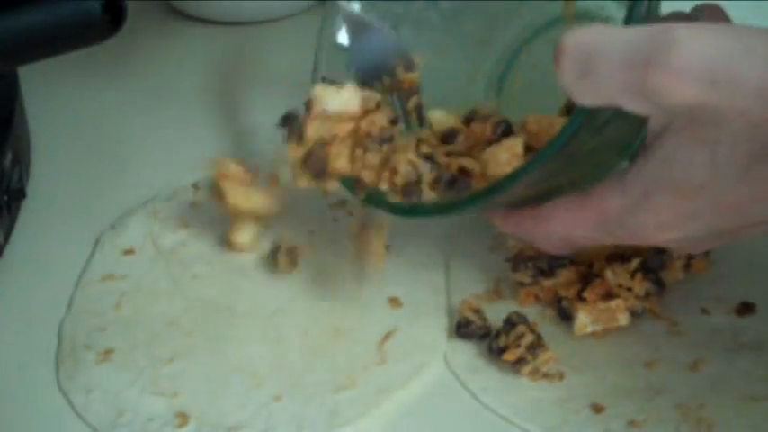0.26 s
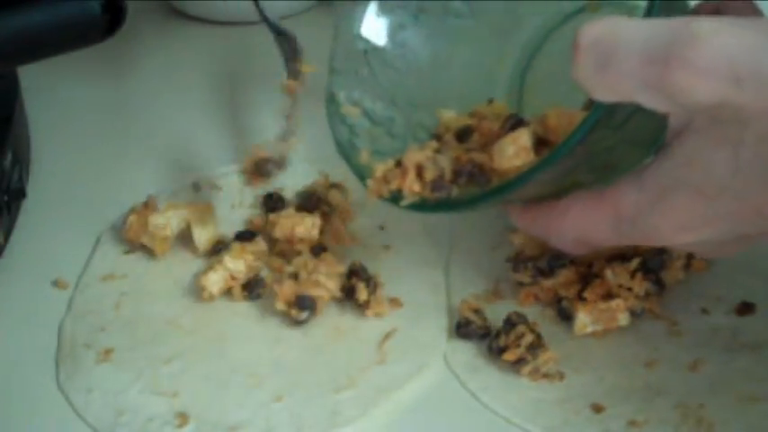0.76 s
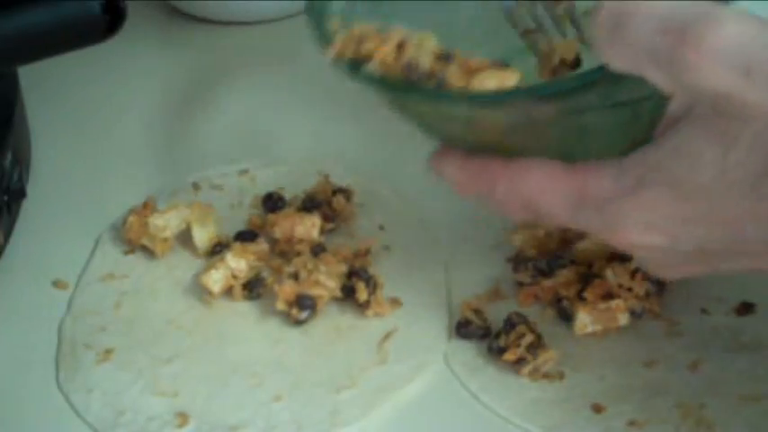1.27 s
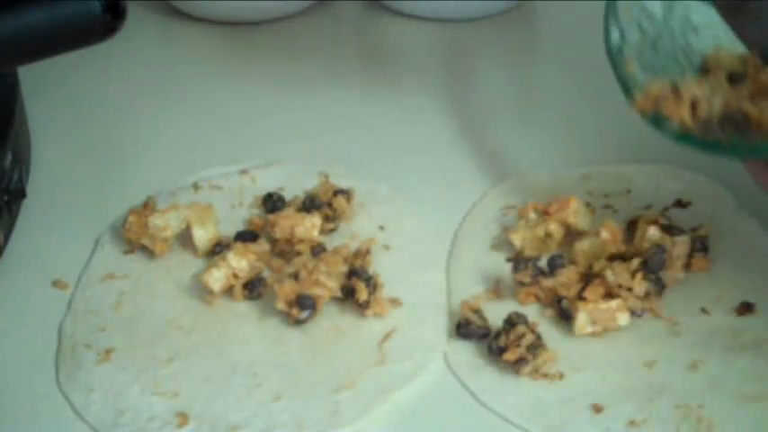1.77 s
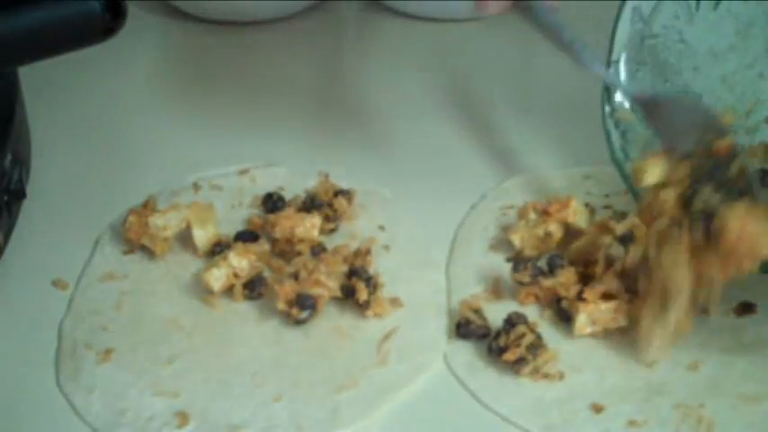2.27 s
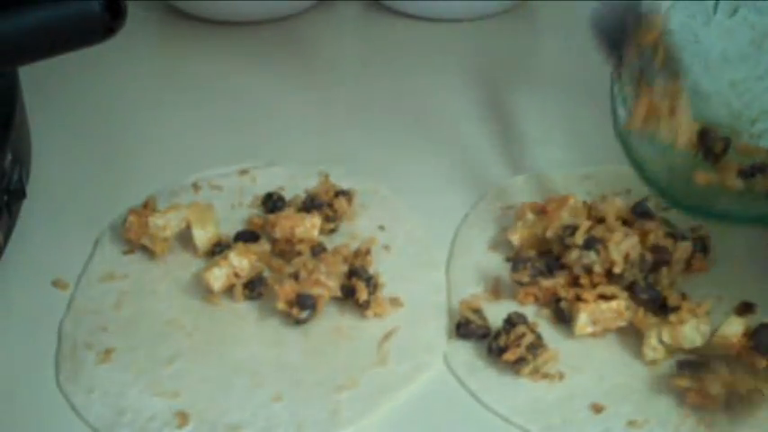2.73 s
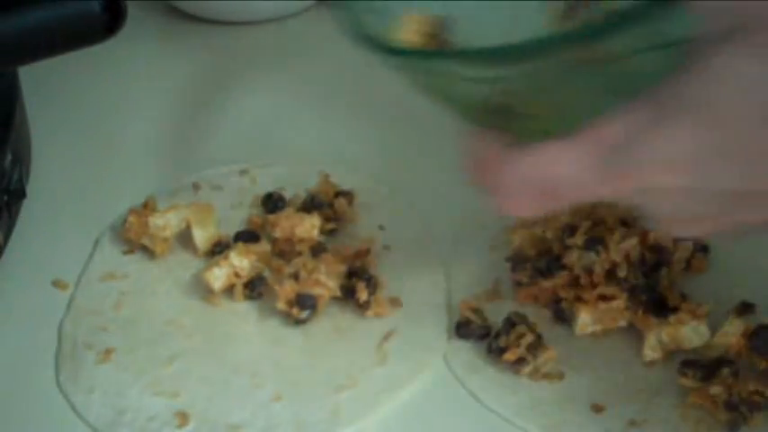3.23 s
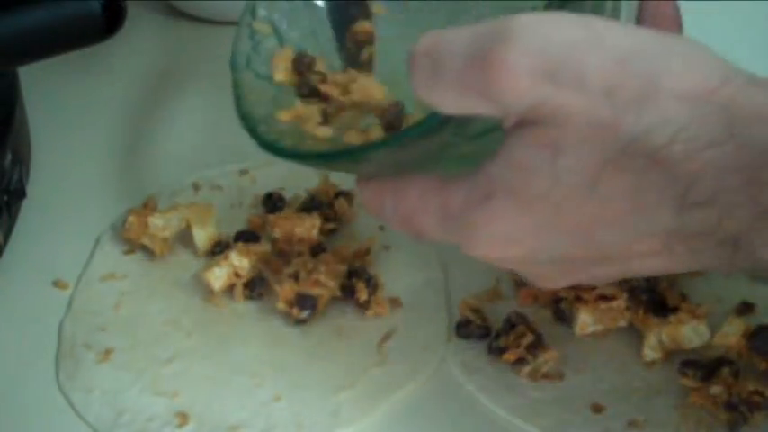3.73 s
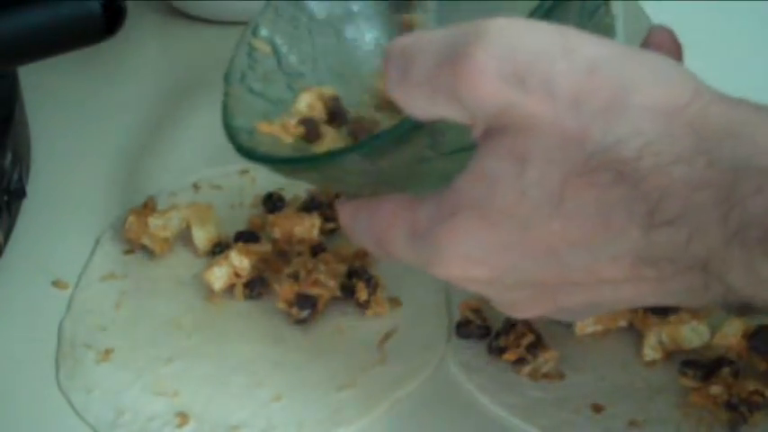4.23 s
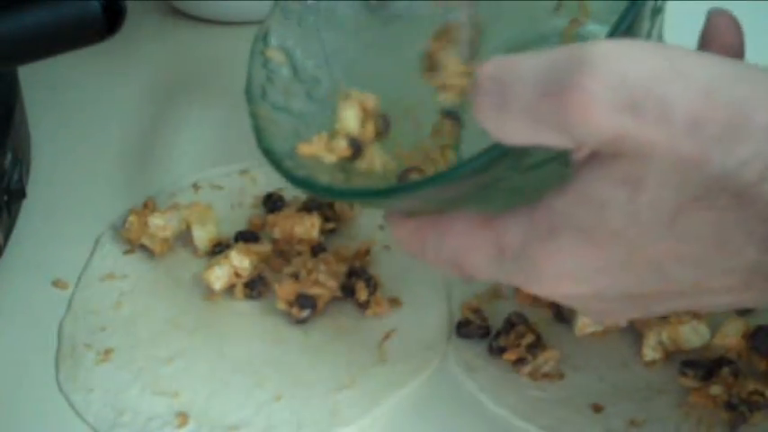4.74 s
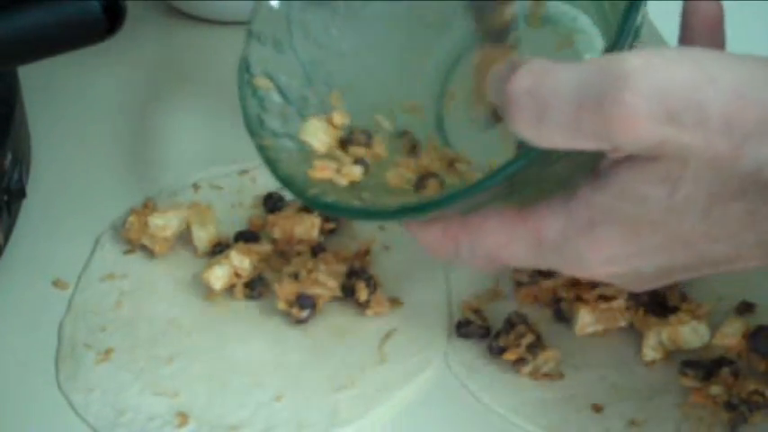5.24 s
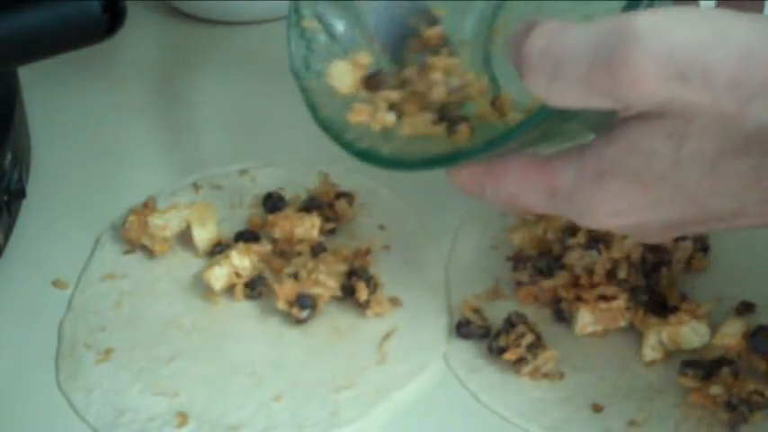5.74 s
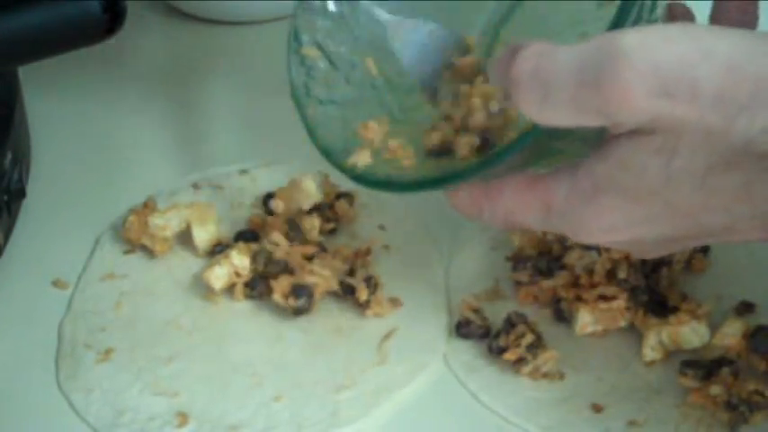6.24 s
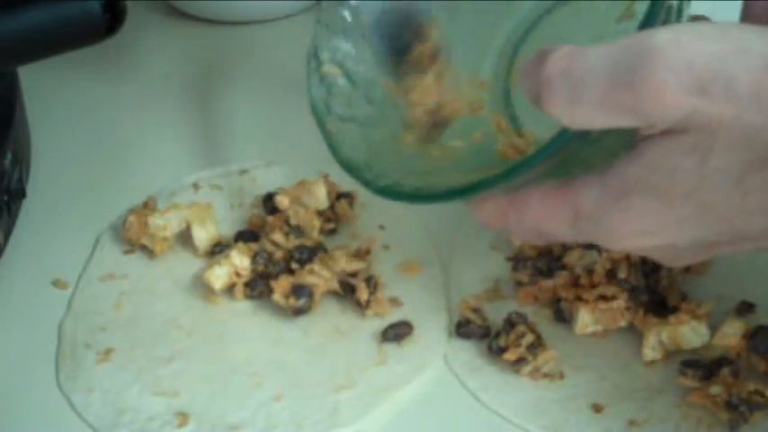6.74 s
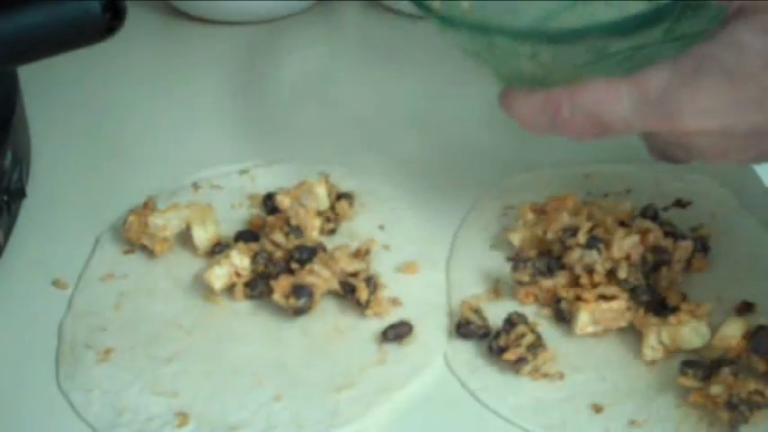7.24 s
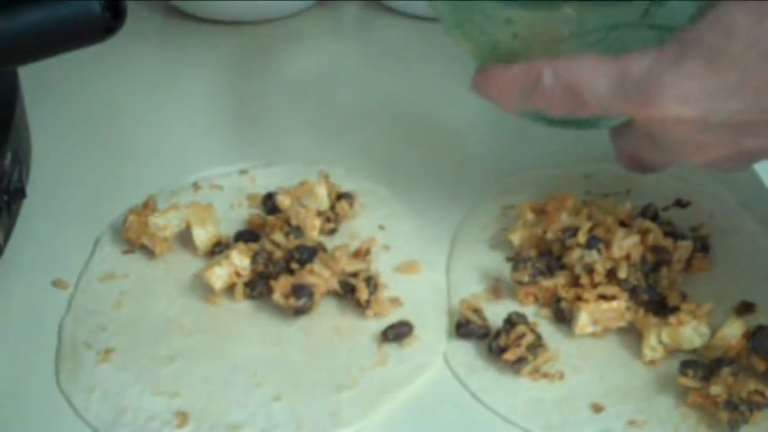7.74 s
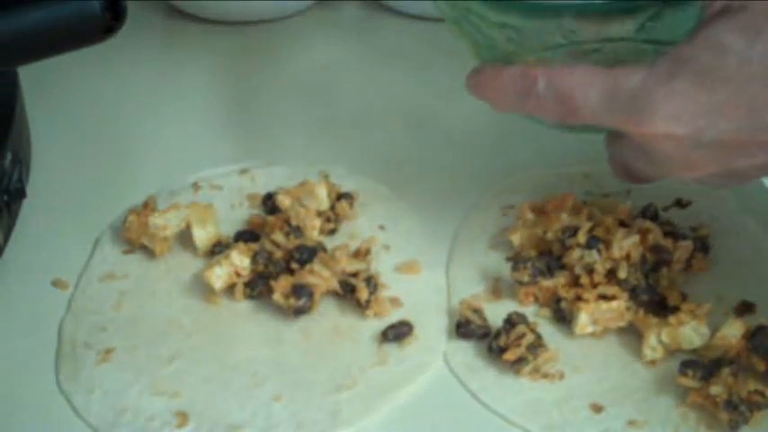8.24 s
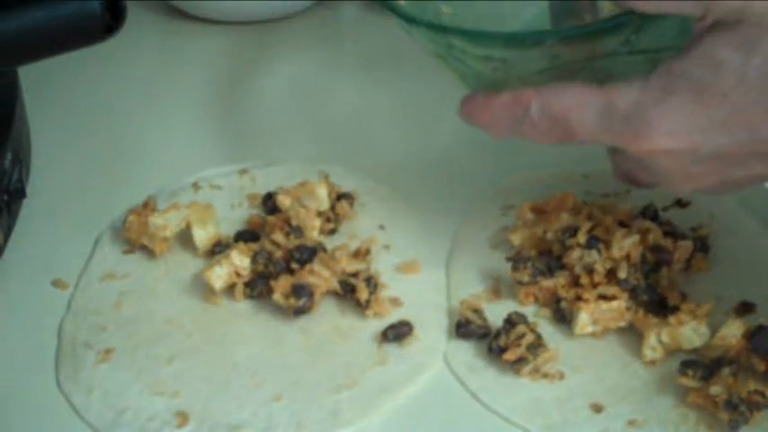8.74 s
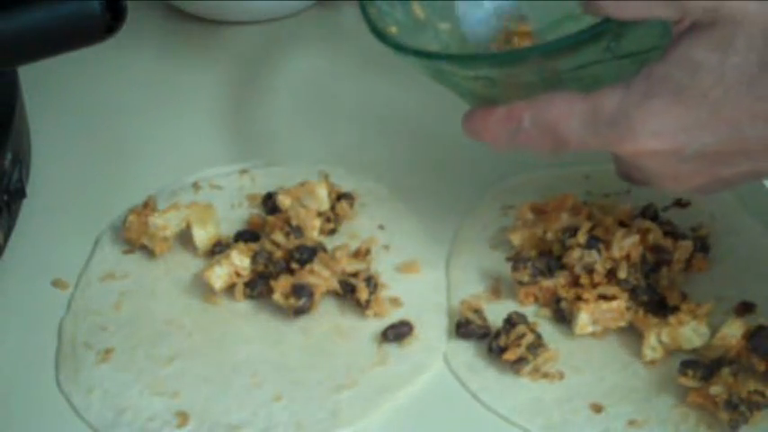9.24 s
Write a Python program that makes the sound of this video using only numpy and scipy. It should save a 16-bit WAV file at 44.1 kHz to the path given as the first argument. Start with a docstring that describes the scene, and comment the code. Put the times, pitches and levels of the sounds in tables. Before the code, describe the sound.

Moist chunky food is pushed from a glass bowl onto soft flatbread. Quiet sticky crackles and dull plops give way to sharp glassy taps, some pressed and rattling. Halfway, taps crowd together and the fork drags roughly along the glass; then loud single clinks alternate with faint wet stirring. Close stereo microphones, slightly left, small live room, faint fan hum, air and hiss.

```python
"""A steel fork clinks in a hand-held glass bowl and scrapes a moist food mix out onto tortillas.
First come a faint clink, wet strokes made of tiny pops and soft noise thuds of landing lumps; then scattered
clinks: noise clatter, a wall knock and ringing glass modes. Light pushes and rasps of coloured clicks follow.
Near 5 s the clinks crowd together, then jerky clicks make one long scrape; hard clinks and strokes end it.
Throughout, a small kitchen carries the ring on over faint hum, air and hiss; the input limits the peaks."""
import sys
import numpy as np
from scipy import signal
from scipy.fft import rfft, irfft
from scipy.io import wavfile
from scipy.ndimage import uniform_filter1d

SR = 44100
rng = np.random.default_rng(int(sys.argv[2]) if len(sys.argv) > 2 else 0)


def to_wav(s):
    """Save 16-bit WAV."""
    ch = np.atleast_2d(s).T  # columns
    pcm = np.round(np.clip(ch, -1, 1) * 32767)  # PCM
    wavfile.write(sys.argv[1], SR, pcm.astype(np.int16))


N = 418950
TIME = np.arange(N) / SR  # [s]

# fork blows on the glass; where each lands sets how hard it drives the bowl's groups of modes:
# (time [s], clack [dB], tick [dB], knock [dB], first, second, third, fourth rim mode [dB],
#  how far the fork stays pressed [0-1], ring length as the grip allows [x], left over right [dB])
FORK_BLOWS = [(0.001, -41, -49, -59, -31.5, -23.5, -33, -55, 0.17, 1, 13),
              (1.311, -11.5, -8.5, -32, -33.5, -23, -0.5, -14.5, 0.1, 1, 3.6),
              (1.714, -18, -19.5, -43, -32.5, -47, -29, -14.5, 0.9, 1.1, 9),
              (3.376, -15.5, -9, -36, -34.5, -20, -13.5, -11.5, 0.65, 1, 1.8),
              (3.455, -27.5, -29, -59, -48, -33.5, -24, -39, 0.18, 0.96, 5.4),
              (3.587, -29.5, -40.5, -60, -45.5, -39.5, -47, -34, 0.5, 0.88, 1.5),
              (3.995, -45, -28, -44.5, -74, -52, -55, -24.5, 1, .8, 1),
              (4.45, -64, -58, -39, -44, -74, -65, -56, 0.046, .6, 4.4),
              (4.905, -26.5, -27, -36, -35.5, -34, -17.5, -23.5, 0.01, .9, 10.5),
              (4.977, -12, -6.5, -23.5, -14.5, -11, -5, -21, 0.073, .8, 4.3),
              (5.264, -17, -10.5, -31.5, -28, -31, -8, -11, 0.56, 1, 14),
              (5.46, -22.5, -23.5, -47, -37, -38, -26, -25.5, 0.9, 1, 4),
              (5.685, -29, -40, -52, -47, -40.5, -24, -37, 0.77, 1, 5.5),
              (6.302, -62, -32, -34, -25.5, -51, -62, -39, .05, .75, 7.3),
              (6.87, -14, -4, -25.5, -12.5, -7, 2, -2.5, 0.15, .85, 5.4),
              (7.498, -8, -5.5, -22.5, -23.5, -8.5, 1, -12.5, 0.23, .9, 8.3),
              (8.103, -16.5, -16.5, -33, -21.5, -14, -4.5, -9.5, 0.48, .7, 7),
              (8.631, -36.5, -30, -38.5, -55, -53, -58, -10.5, 0.1, .3, 4),
              (9.15, -24.5, -15, -39.5, -39, -21.5, -12, -12.5, 0.11, .8, 4.5),
              (9.237, -35.5, -32, -67, -43.5, -36, -27, -27, 0.19, 1, 5)]
# light touches of the tines: (time [s], ring [dB], pitch driven hardest [Hz], clack [dB])
LIGHT_TOUCHES = [(0.171, -55, 1474, -62), (0.556, -49, 5600, -60), (1.397, -41, 3370, -45.5),
                 (2.864, -62, 5670, -59.5), (4.418, -41, 8200, -42.5), (4.899, -34, 8200, -41),
                 (5.29, -46, 7000, -33.5), (5.613, -40, 2330, -43.5), (6.429, -50, 1474, -72),
                 (7.541, -35, 1474, -67), (8.824, -53.5, 3300, -68), (9.146, -24, 8000, -35.5)]
TOUCH_FALL_DB = 20  # per octave away from the pitch driven hardest
# ways the bowl rings, in five groups: four rim modes and the upper ones. The lowest two have a faint
# twin that the hand hardly damps: (pitch [Hz], level [dB], time to fall 60 dB before grip and bend [s])
BOWL_MODES = [
    [(1474, 0, .14), (966, -20, .07), (1477, -26, .4)],
    [(3290, 0, .11), (3335, -13, .09), (3278, -28, .38)],
    [(5527, 0, .07), (5380, -22, .05)],
    [(8135, 0, .11)],
    [(8935, -4, .07), (10065, -9, .08), (10900, -6, .06), (11030, -8, .07), (11240, -6, .07),
     (13120, -10, .07)],
]
# a fork that stays pressed damps the modes, mostly below REACH_HZ, and makes their pitch jitter
PRESS_DAMPING, PRESS_JITTER_HZ, REACH_HZ = 0.81, 85, 7000
# the pressed tines buzz in one broad resonance and pull the bowl's nearby modes sharp
FORK_HZ, FORK_Q, FORK_PULL_HZ = 5200, 7, 160
# tone of the fork's clack on the glass: (pitch [Hz], level [dB])
CLACK_COLOUR = [(250, -26.5), (500, -15), (1100, -3), (1600, 3), (2100, 4), (2900, 2), (3700, 2),
                (4300, -6), (5200, 12), (6200, -14), (9000, -34.5)]
# tone of the sharper tick: (pitch [Hz], level [dB])
TICK_COLOUR = [(2000, -43.5), (4000, -11), (5200, -7), (6500, -9.5), (7500, 0), (8600, -3), (9500, -16),
               (11300, -14.5), (13800, -17.5), (15000, -37.5)]
# low modes of the bowl in the hand: (pitch [Hz], level [dB], time to fall 60 dB [s])
LOW_BOWL_MODES = [(814, -9, 0.046), (964, -2.5, 0.039)]
# dull response of the hand-held wall to knocks: (pitch [Hz], level [dB])
WALL_COLOUR = [(80, -26), (560, 1.5), (1700, -7.5), (2150, -25.5), (8000, -48)]
# fork dragged over the glass: (time [s], level [dB], brightness [dB])
SCRAPE_PATH = [(5.69, -63, -17), (5.74, -39, 2), (5.82, -39, 4.5), (5.885, -33, 7.5), (5.935, -37.5, 8),
               (5.98, -42, 6.5), (6.05, -45.5, 4), (6.14, -57, 6.5), (6.25, -65, -2)]
# tone of the scraped wall: (pitch [Hz], level [dB])
SCRAPE_BODY_COLOUR = [(150, -28), (450, -13.5), (800, -5.5), (1050, -0.5), (1330, -11), (1520, -3),
                      (1850, -29), (9000, -62)]
# tone of the fine scraping edge: (pitch [Hz], level [dB])
SCRAPE_EDGE_COLOUR = [(1200, -30), (2000, -1.5), (2340, 0.5), (2650, -6.5), (3300, 4), (3700, -5.5),
                      (4700, 1.5), (5800, -9), (7400, -1), (10000, -22), (15000, -48.5)]
# food pushed along the wall: (middle [s], length [s], level [dB])
FOOD_PUSHES = [(2.95, 0.99, -64.5), (4.47, 0.057, -55.5), (4.94, 0.14, -41), (8.62, 0.4, -55.5),
               (8.77, 0.16, -54)]
# tone of food rubbing on the wall: (pitch [Hz], level [dB])
PUSH_COLOUR = [(150, -20.5), (450, 0.5), (620, -6.5), (1150, -10), (1500, -8), (2400, -25.5), (8000, -47)]
# light drags of the tines along the wall: (middle [s], length [s], level [dB])
LIGHT_RASPS = [(2.9, 0.51, -60), (6.44, .2, -61), (8.74, 0.13, -57)]
# strokes of the tines through the moist food: (middle [s], length [s], level [dB])
FOOD_STROKES = [(.02, .12, -45.5), (.21, 0.2, -49.5), (.48, 0.28, -53.5), (1.95, 0.39, -57.5),
                (2.34, 0.14, -59.5), (4.0, 1.0, -56), (4.05, 0.038, -45), (4.19, 0.04, -50),
                (4.967, .025, -37.5), (5.25, .5, -55), (6.42, 0.35, -58), (8.2, .6, -56),
                (8.715, 0.19, -46.5), (9.22, .04, -43.5)]
STROKE_EDGE_DB = 6  # a stroke swells and fades; half a length from its middle it is this much down
# tone of the wet pops: (pitch [Hz], level [dB])
SQUELCH_COLOUR = [(500, -7), (2200, -8.5), (6000, -5), (8000, 8.5), (9500, -3), (14000, -14.5),
                  (15000, -32)]
# lumps landing on the tortilla: (time [s], level [dB])
LUMP_LANDINGS = [(0.346, -40.5), (0.378, -49), (0.495, -43.5), (0.515, -46), (0.618, -47)]
# tone of the soft thuds: (pitch [Hz], level [dB])
THUD_COLOUR = [(50, -12), (110, 6), (330, 1.5), (520, -5), (900, -18), (3000, -28)]
# how long the kitchen rings: (pitch [Hz], time to fall 60 dB [s])
ROOM_T60 = [(200, 0.16), (1500, 0.42), (3300, 0.4), (5500, 0.3), (8000, 0.43), (14000, 0.14)]
# mains and fan motor hum: (pitch [Hz], rms level [dB])
HUM_TONES = [(58.6, -60.5), (117.6, -74.5), (199.2, -61)]
# drone of the fan: (pitch [Hz], half-width [Hz], level [dB])
FAN_DRONE = [(199.3, 6, -67), (221.4, 5, -65.5), (325, 14, -68.5), (374, 13, -69)]
# tone of the air: (pitch [Hz], level [dB])
AIR_COLOUR = [(20, -16.5), (90, -5.5), (150, 1.5), (300, 1.5), (1060, -6), (1600, -16.5), (8000, -50)]
# the air is most alike at both microphones from about 150 to 950 Hz, less below, hardly above:
# (pitch [Hz], likeness [0-1])
AIR_LIKENESS = [(60, 0.5), (150, 1), (950, 0.93), (2400, 0.05)]
# tone of each microphone's own hiss: (pitch [Hz], level [dB])
HISS_COLOUR = [(300, 12), (1100, 3.5), (5500, 3.5), (7500, 6), (9500, -2.5), (14000, -6), (14800, -30)]
# tone of the nearby sounds and room at the right microphone: (pitch [Hz], level [dB])
RIGHT_SHADE = [(200, 0.5), (5500, 3.5), (6800, -3.5), (8100, -11.5), (10000, -19), (11500, -6.5),
               (14000, -10)]
EDGE_HZ = 15000  # upper band limit


def clinks(clack_t60=0.032, tick_t60=0.049, chatter_db=-16, chatter_t60=0.072, buzz_db=-5, buzz_t60=.06,
           upper_db=-9):
    """Each blow gives a short clatter of the fork, a dull knock of the wall and a ring of the bowl."""
    out = np.zeros((2, N))
    t = np.arange(SR // 6) / SR
    clack = unit(colour(rng.standard_normal(2 * SR), CLACK_COLOUR))
    tick = unit(colour(rng.standard_normal(2 * SR), TICK_COLOUR))
    fork_peak = signal.iirpeak(FORK_HZ, FORK_Q, fs=SR)
    buzz = unit(signal.lfilter(*fork_peak, colour(rng.standard_normal(2 * SR), CLACK_COLOUR)))
    chatter = amp(chatter_db - 60 * t / chatter_t60)  # the tines go on buzzing against the glass
    clack_fall = np.hypot(amp(-60 * t / clack_t60), chatter)
    tick_fall = np.hypot(amp(-60 * t / tick_t60), chatter)
    blows = list(FORK_BLOWS) + [touch(*row) for row in LIGHT_TOUCHES]
    for s, clack_db, tick_db, knock_db, *rim_db, pressed, life, pan_db in blows:
        span = rng.integers(SR) + np.arange(len(t))  # a fresh stretch of noise
        contact = amp(clack_db) * clack_fall * clack[span]
        contact += amp(tick_db) * tick_fall * tick[span]
        contact += pressed * amp(clack_db + buzz_db - 60 * t / buzz_t60) * buzz[span]
        contact *= np.minimum(t / 0.0001, 1)
        add(out, s, place(contact, right_db=8.0))
        add(out, s, place(amp(knock_db) * wall_knock(t), right_db=4.5))
        group_db = rim_db + [tick_db + upper_db]  # a sharper tick drives the upper modes harder
        add(out, s, bowl_ring(group_db, pressed, life) * amp([[0], [-pan_db]]))
    return out


def touch(s, ring_db, centre_hz, clack_db, knock_db=-6):
    """A light touch is a free clink that drives mainly the modes near one pitch."""
    rim_hz = np.array([group[0][0] for group in BOWL_MODES[:4]])
    rim_db = ring_db - TOUCH_FALL_DB * abs(np.log2(rim_hz / centre_hz))
    return (s, clack_db, clack_db, clack_db + knock_db, *rim_db, 0, 1, 5)


def bowl_ring(group_db, pressed, life, bend=1.327, detune=0.0018, apart_rad=.7, contact_s=0.00015, size=200):
    """The glass modes after one touch, at two microphones; each holds briefly, then falls faster."""
    t = np.arange(SR // 2) / SR
    modes = [(f, db + drive, ring_s) for group, drive in zip(BOWL_MODES, group_db) for f, db, ring_s in group]
    hz, db, t60 = np.array(modes).T[:, :, None]
    held = pressed / (1 + (hz / REACH_HZ) ** 4)
    jitter = unit(uniform_filter1d(rng.standard_normal((len(hz), len(t))), size, axis=1))
    # the grip and the load of food shift each mode a little from blow to blow
    pitch = hz * (1 + detune * rng.uniform(-1.4, 1, hz.shape))
    pitch = pitch + PRESS_JITTER_HZ * held * jitter
    pitch += pressed * FORK_PULL_HZ / (1 + (FORK_Q * (hz / FORK_HZ - 1)) ** 2)
    age = t * (1 + PRESS_DAMPING * held) / (t60 * max(life, .1))  # 1 when the mode is 60 dB down
    decay = amp(db - 60 * age ** bend) * (1 - np.exp(-t / contact_s))
    # the rim radiates in lobes, so each mode arrives with its own phase at each microphone
    lobes = apart_rad * rng.uniform(-0.4, 1, (2, len(hz), 1))
    phase = 2 * np.pi * np.cumsum(pitch, axis=1) / SR
    return (decay * np.sin(phase + lobes)).sum(1)


def wall_knock(t, thud_db=-4, thud_t60=0.049, ring_db=-1):
    """A dull thud and the short low modes of the bowl in the hand."""
    thud = unit(colour(rng.standard_normal(len(t)), WALL_COLOUR)) * amp(thud_db - 60 * t / thud_t60)
    ring = sum(amp(ring_db + db - 60 * t / t60) * np.sin(2 * np.pi * hz * t) for hz, db, t60 in LOW_BOWL_MODES)
    return thud + ring


def scraping(slip_share=0.65, wall_hz=1050, wall_q=12, wall_share=1.03, body_db=0.0, edge_db=-11.5,
             push_db=-1.5):
    """The tines stick and slip, uneven jerks over a fine dense rub; pushed food rubs the wall softly."""
    jerks = grains(per_s=210, spread_db=1.0)
    rub = unit(grains(per_s=5100, spread_db=5.5) + slip_share * jerks)
    s, _, bright_db = np.transpose(SCRAPE_PATH)
    wall = colour(rub, SCRAPE_BODY_COLOUR)
    # the jerks keep one low resonance of the wall ringing
    wall_ring = signal.lfilter(*signal.iirpeak(wall_hz, max(wall_q, 1), fs=SR), wall)
    body = amp(body_db) * unit(wall + wall_share * wall_ring)
    fine = patchy(colour(grains(per_s=5900, spread_db=-5.5), SCRAPE_EDGE_COLOUR), depth_db=1.0)
    edge = amp(edge_db + np.interp(TIME, s, bright_db)) * fine
    food_rub = patchy(colour(grains(per_s=1800, spread_db=1.5), PUSH_COLOUR), depth_db=0.5)
    push = amp(push_db) * strokes(FOOD_PUSHES) * food_rub
    drag = level(SCRAPE_PATH)
    return place(drag * body + push, right_db=0.0) + place(drag * edge, right_db=6.5)


def rasping():
    """The tines draw lightly along the wall, a fine grain coloured by the fork's resonances."""
    grain = patchy(colour(grains(per_s=1500, spread_db=-2.5), SCRAPE_EDGE_COLOUR), depth_db=4.5)
    return place(strokes(LIGHT_RASPS) * grain, right_db=7.0)


def food(squelch_db=1, glass_db=-19, thud_t60=0.095):
    """Tiny wet pops as the mix is moved, light touches that set the glass singing, soft thuds of lumps."""
    pops = patchy(colour(grains(per_s=15000, spread_db=1.74), SQUELCH_COLOUR), depth_db=4.0)
    ring = bowl_ring(-2 * np.arange(len(BOWL_MODES)), 0, 1)[0]
    singing = signal.oaconvolve(grains(per_s=180, spread_db=4.5), ring)[:N]
    moved = amp(squelch_db) * strokes(FOOD_STROKES) * (pops + amp(glass_db) * unit(singing))
    landing = np.zeros(N)
    t = np.arange(SR // 5) / SR
    for s, db in LUMP_LANDINGS:
        thud = unit(colour(rng.standard_normal(len(t)), THUD_COLOUR))
        add(landing, s, amp(db - 60 * t / thud_t60) * np.minimum(t / 0.00098, 1) * thud)
    return place(moved, right_db=4.0) + place(landing, right_db=-1.0)


def kitchen(x, rise_s=0.004, count=22):
    """Dense reflections of random sign, each band dying at its own speed."""
    signs = rng.choice([-1., 1.], (2, SR // 2))
    taps = signs * (rng.random((2, SR // 2)) < 2 / count)
    hz, t, z = signal.stft(taps, SR, nperseg=256)
    z = z * amp(-60 * t / read(ROOM_T60, hz)[:, None]) * (1 - np.exp(-t / rise_s))
    tail = signal.istft(z, SR, nperseg=256)[1]
    return signal.oaconvolve(x[None], tail / np.linalg.norm(tail[0]), axes=1)[:, :N]


def background(air_db=-61.0, hiss_db=-62, hum_lag_rad=0.66):
    """Steady hum, the narrow resonances of an appliance fan, a soft wash of air and microphone hiss."""
    lag = np.array([[hum_lag_rad], [0]])  # the left channel trails
    hum = sum(amp(db) * np.sqrt(2) * np.sin(2 * np.pi * (hz * TIME + rng.random()) - lag)
              for hz, db in HUM_TONES)
    f = np.fft.rfftfreq(N, 1 / SR)
    peaks = sum(amp(db) * unit(1 / (1 + ((f - hz) / width) ** 2)) for hz, width, db in FAN_DRONE)
    spectrum = np.hypot(peaks, amp(air_db) * unit(amp(read(AIR_COLOUR, f))))
    a, b = rfft(rng.standard_normal((2, N)))
    same = np.clip(read(AIR_LIKENESS, f), 0, 1)
    both_sides = np.array([a, same * a + np.sqrt(1 - same ** 2) * b])
    air = irfft(both_sides * spectrum, N)
    hiss = np.array([unit(colour(rng.standard_normal(N), HISS_COLOUR)) for _ in range(2)])
    return hum + air + amp(hiss_db) * hiss * amp([[0], [-4]])


def grains(per_s, spread_db):
    """Random clicks of uneven size: a positive spread makes a few much larger, a negative one smaller."""
    chance = rng.random(N)
    at = np.flatnonzero(chance < per_s / SR)
    sign = 1 - 2 * (at % 2)
    size = np.minimum(-np.log(chance[at] * SR / per_s), 4)
    clicks = np.zeros(N)
    clicks[at] = sign * amp(spread_db * size)
    return unit(clicks)


def patchy(x, depth_db, size=9):
    """Lets the colour wander in small patches of time and pitch."""
    z = signal.stft(x, nperseg=256)[2]
    patches = uniform_filter1d(rng.standard_normal(z.shape), size // 2, axis=0)
    patches = unit(uniform_filter1d(patches, size, axis=1))
    return unit(signal.istft(z * amp(depth_db * patches), nperseg=256)[1][:N])


def swell(middle, length, db):
    """Gain of one stroke, rising and falling smoothly."""
    fall_db = STROKE_EDGE_DB * (2 * (TIME - middle) / length) ** 2
    return amp(db - np.minimum(fall_db, 200))


def strokes(rows):
    """Gain curve of a series of strokes."""
    return np.sqrt(sum(swell(*row) ** 2 for row in rows))


def level(rows):
    """Gain curve from rows that start with (time [s], level [dB]), silent outside them."""
    s, db = np.transpose(rows)[:2]
    return amp(np.interp(TIME, s, db)) * (TIME >= s[0]) * (TIME <= s[-1])


def colour(x, points, size=2048):
    """Filters a sound to the given spectrum without any sound ahead of its start."""
    log_gain = np.log(amp(read(points, abs(np.fft.fftfreq(size, 1 / SR)))))
    # the Hilbert transform gives the phase that lets the filter respond soonest
    taps = np.fft.ifft(np.exp(np.conj(signal.hilbert(log_gain)))).real[:size // 2]
    return signal.oaconvolve(x, taps)[:len(x)]


def read(points, hz):
    """Reads a table of values by pitch on a log-frequency axis."""
    f, value = np.transpose(points)
    return np.interp(np.log(hz + 1), np.log(f + 1), value)


def place(x, right_db):
    """Two channels, the right one weaker by right_db (stronger if negative)."""
    return np.array([x, amp(-right_db) * x])


def add(mix, s, sound):
    """Mixes a sound in at time s."""
    part = mix[..., max(round(s * SR), 0):][..., :sound.shape[-1]]
    part += sound[..., :part.shape[-1]]


def amp(db):
    """Decibels to gain."""
    return np.exp(np.asarray(db) * (np.log(10) / 20))


def unit(x):
    """Scales to rms 1."""
    return x / np.sqrt(np.mean(x ** 2) + 1e-20)


def scene(room_db=-17, left_lag=3):
    """Bowl and food close to the microphones, the room behind."""
    near = clinks() + scraping() + food() + rasping()
    room = amp(room_db) * kitchen(near[0]) * amp([[0], [-2]])
    left, right = near + room
    # the sound reaches the left microphone a moment later (left_lag in samples)
    return np.array([np.roll(left, left_lag), colour(right, RIGHT_SHADE)]) + background()


def record(dry, ceiling=1.0, lopsided=0.13):
    """The input overloads smoothly, slightly sooner on the negative side; then the band limit."""
    limit = ceiling * (1 + lopsided * np.sign(dry))
    clipped = dry / (1 + (dry / limit) ** 8) ** (1 / 8)
    lowpass = signal.firwin(255, EDGE_HZ, window=("kaiser", 8), fs=SR)
    return signal.oaconvolve(clipped, lowpass[None], "same")


dry = scene()
out = record(dry)
to_wav(out)
```